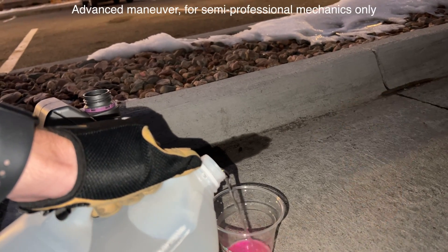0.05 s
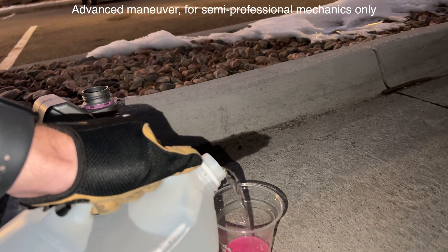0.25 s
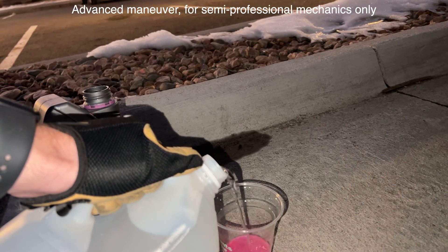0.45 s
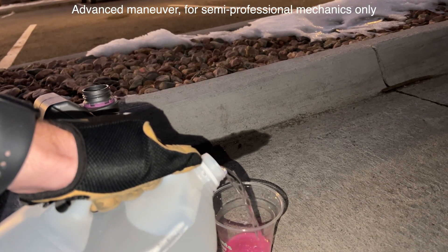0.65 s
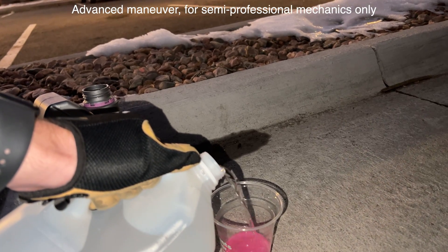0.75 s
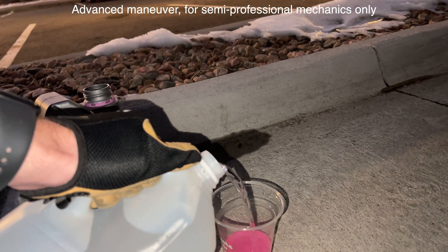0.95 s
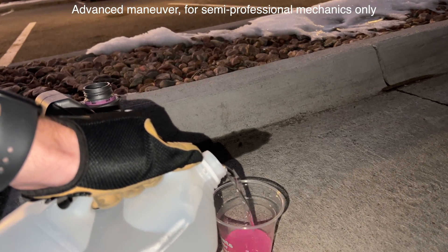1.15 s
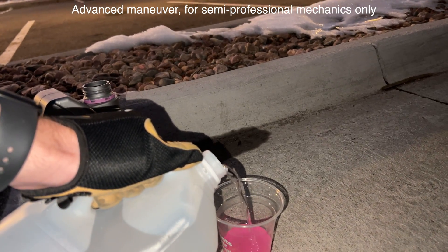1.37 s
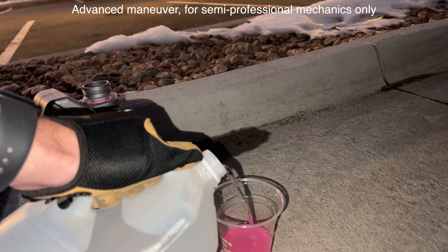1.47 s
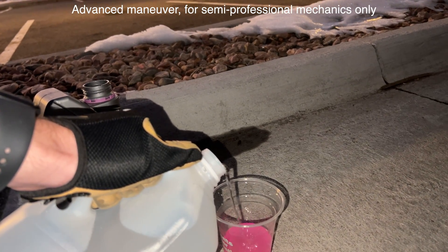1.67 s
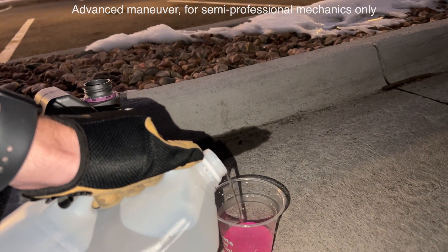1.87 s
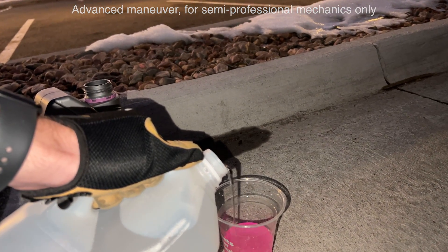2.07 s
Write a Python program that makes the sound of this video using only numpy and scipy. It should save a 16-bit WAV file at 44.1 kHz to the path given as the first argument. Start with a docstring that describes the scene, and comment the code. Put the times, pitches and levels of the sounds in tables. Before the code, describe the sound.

Water dribbling from a jug into a plastic cup outdoors, crackly and bubbly, then nearly silent, then ticking again

```python
"""Outdoors, close to a plastic cup filled from a plastic jug, with traffic rumbling far off.
Where the thin stream breaks up, drops tick on the surface as short noise bursts and trap bubbles that slap and
ring briefly, over a fizz and spray of tiny damped sines. Between about 1.1 and 1.7 s it runs almost silently,
then ticks again. The traffic is shaped noise. The two ports of a phone hear it all with unlike phase."""
import sys
import numpy as np
from scipy import signal
from scipy.fft import rfft, irfft, next_fast_len
from scipy.io import wavfile
from scipy.ndimage import uniform_filter1d

SR = 44100
rng = np.random.default_rng(int(sys.argv[2]) if len(sys.argv) > 2 else 0)


def transcribe(u):
    """Save the signal u as a 16-bit wav file named by the first command-line argument.

    u: samples, shape (n,) or (channels, n), limited to [-1, 1]; the rate is SR.
    q: integer samples, one column per channel.
    """
    v = np.clip(np.atleast_2d(u).T, -1, 1)
    q = np.round(v * 32767).astype(np.int16)
    wavfile.write(sys.argv[1], SR, q)


N = 93227  # samples

# How strongly the stream breaks up: t/s, fizz of small bubbles level/dB, spray level/dB (before the port colour)
SPLASH_LEVELS = [(0, -69, -69), (.05, -68, -80), (.18, -69, -74), (.22, -73, -84), (.41, -67.5, -80),
                 (.45, -62.5, -80), (.57, -69, -76), (.61, -72, -81), (.67, -60, -68.5),
                 (.84, -64.5, -72.5), (.88, -80.5, -81), (1.04, -82, -88), (1.12, -82.5, -81.5),
                 (1.66, -89, -110.5), (1.72, -73.5, -81), (1.8, -88, -87), (1.92, -99, -113),
                 (1.98, -68.5, -85), (2.04, -83, -86)]


def amp(db):
    """Decibels to amplitude."""
    return 10 ** (np.asarray(db) / 20)


def unit(x):
    """Scale to an rms of 1."""
    return x / np.sqrt(np.mean(x ** 2) + 1e-20)


def along(points, hz):
    """Read a curve of (f/Hz, value) points on a log frequency axis."""
    f, value = np.transpose(points)
    return np.interp(np.log(hz + 1), np.log(f + 1), value)


def curves(rows):
    """One value per sample for each column after the time."""
    s, *columns = np.transpose(rows)
    return [np.interp(np.arange(N) / SR, s, column) for column in columns]


def filtered(x, response):
    """Multiply the spectrum of x by a complex response of frequency."""
    m = next_fast_len(N + 8192)
    spectrum = rfft(x, m) * response(np.fft.rfftfreq(m, 1 / SR))
    return irfft(spectrum, m)[..., :N]


def ports(pair, lag, pan):
    """Give each microphone port half of the phase and level difference, with opposite signs."""
    def half(hz):
        level = amp(along(pan, hz) / 2)
        return level * np.exp(-.5j * np.interp(hz, *np.transpose(lag)))

    return filtered(pair, lambda hz: np.array([half(hz), 1 / half(hz)]))


def place(start_s, shapes):
    """Sum short shapes at their start times."""
    first = np.round(np.asarray(start_s) * SR).astype(int)[:, None]
    at = first + np.arange(shapes.shape[1])
    return np.bincount(np.clip(at, 0, N).ravel(), shapes.ravel(), N + 1)[:N]  # overshoot goes in a spare bin


def outdoors():
    """Far traffic: noise, near mono in the rumble and mostly less alike at the ports higher up."""
    level_db, fade_db_per_s = -46, 0.7  # level halfway through; the traffic draws away
    # Colour of the far traffic, relative: f/Hz, level/dB per Hz
    air_colour = [(20, -31.5), (38, -9.5), (52, -2.5), (70, 2.5), (100, -2), (210, -10), (320, -16),
                  (450, -23.5), (600, -29), (900, -26.5), (1300, -35.5), (2000, -45), (3500, -52.5),
                  (7000, -64), (9200, -74), (11000, -67), (14400, -67.5), (15200, -82)]
    # Likeness of the two ports: f/Hz, correlation [-1 to 1]
    air_alike = [(60, .98), (290, 0.95), (600, 0.1), (1400, 0.6), (3300, 0.28), (8000, 0.14), (10500, 0.97)]
    # Phase of the right port over the left: f/Hz, phase/rad
    air_lag = [(80, 0), (500, 1), (900, 2), (2600, 0), (7500, -.4), (9000, -3.1), (11700, -6.3),
               (14400, -9.6)]
    # Level of the left port over the right: f/Hz, level/dB
    air_pan = [(300, 0), (650, -0.5), (1200, -0.5), (5000, -4.5), (9000, 0)]

    def mid_side(hz):
        turn = np.arccos(np.clip(along(air_alike, hz), -1, 1)) / 2
        return amp(along(air_colour, hz)) * [np.cos(turn), np.sin(turn)]

    mid, side = filtered(rng.standard_normal((2, N)), mid_side)
    traffic = unit(ports(np.array([mid + side, mid - side]), air_lag, air_pan))
    from_middle_s = (np.arange(N) - N / 2) / SR
    return amp(level_db - fade_db_per_s * from_middle_s) * traffic


def scattered(x, db, t60):
    """x at both ports, plus a diffuse decaying noise answer drawn afresh for each short block."""
    # Phase of the right port over the left for sound from the cup: f/Hz, phase/rad
    cup_lag = [(0, 0), (860, -2.5), (1200, -.8), (2300, 1.5), (2900, 2), (4000, 1), (7500, -.8),
               (9000, -3.1), (11700, -6.3), (14400, -9.6), (16000, -11.6)]
    # Level of the left port over the right for sound from the cup: f/Hz, level/dB
    cup_pan = [(800, -4), (2300, 0.5), (3000, -5.5), (5500, -9.5), (8000, 0)]
    step = 2048  # samples a block
    diffuse = np.zeros((2, N + 8192))
    fade = amp(-60 * np.arange(step) / SR / t60)
    for i in range(0, N, step):
        echo = rng.standard_normal((2, step)) * fade
        answer = signal.fftconvolve(x[None, i:i + step], echo, axes=1)
        diffuse[:, i:i + answer.shape[1]] += answer / np.linalg.norm(fade)
    return ports(x, cup_lag, cup_pan) + amp(db) * diffuse[:, :N]


def grains(count, hz, spread, cycles, scatter_db):
    """Tiny sines of random time, pitch and size, losing 20 dB in the given cycles; rms 1."""
    u, t = rng.random((count, 3)), np.arange(400) / SR
    f = np.clip(hz * np.exp(spread * rng.standard_normal((count, 1))), 600, 16000)
    size = amp(-scatter_db * np.log(u[:, 1:2]))  # exponential scatter in dB
    decay = amp(-60 * t * f / (3 * cycles))
    return unit(place(u[:, 0] * N / SR, size * np.sin(2 * np.pi * f * t) * decay))


def fizz():
    """Many small bubbles as tiny rings, coloured by the resonances of the air in the cup."""
    # Resonances of the air in the cup: f/Hz, width/Hz, boost/dB
    cup_air = [(1020, 130, 16.5), (2400, 1770, 13), (3645, 390, 7.5)]
    fizz_db, _ = curves(SPLASH_LEVELS)
    small = grains(count=5000, hz=2580, spread=0.69, cycles=20, scatter_db=3.2)

    def cup(f):
        return amp(sum(db / (1 + (2 * (f - centre) / width) ** 2) for centre, width, db in cup_air))

    return amp(fizz_db) * unit(filtered(small, cup))


def spray():
    """Fine high spray: sines so strongly damped that they merge into a hiss."""
    _, spray_db = curves(SPLASH_LEVELS)
    return amp(spray_db) * grains(count=7000, hz=9160, spread=0.46, cycles=3.2, scatter_db=2.8)


def bubbles():
    """A broad slap traps each bubble, which rings: soft start, short hold, decay as the pitch creeps up."""
    # Single bubbles: t/s, level/dB, f/Hz (pitch at the end of the hold)
    trapped = [(0.0442, -67, 2020), (0.0561, -49, 2600), (0.0788, -51.5, 5300), (0.0936, -55, 3710),
               (0.097, -60, 903), (0.0977, -51, 2095), (0.0988, -51, 1640), (0.1095, -54, 1325),
               (0.113, -52, 891), (0.131, -59, 3950), (0.133, -54.5, 2570), (0.1311, -55.5, 1823),
               (0.1334, -54.5, 1330), (0.1517, -48.5, 1220), (0.173, -58, 1650), (0.176, -54, 2130),
               (0.2076, -56, 3570), (0.2422, -48.5, 2690), (0.26, -62, 2250), (0.2749, -57.5, 3210),
               (0.4433, -52.5, 3500), (0.4463, -54, 5160), (0.4613, -57.5, 2440), (0.4815, -52.5, 3400),
               (0.4955, -54.5, 2420), (0.5308, -60, 1370), (0.539, -57.5, 1990), (0.5419, -57, 3720),
               (0.5415, -56.5, 2880), (0.552, -55, 902), (0.5867, -64.5, 5630), (0.6437, -59, 1326),
               (0.66, -66, 3700), (0.665, -61, 1340), (0.6707, -50, 3470), (0.6857, -51, 3840),
               (0.6868, -53, 2600), (0.801, -58, 3600), (0.6991, -53, 3000), (0.7153, -56.5, 3750),
               (0.7472, -47.5, 2710), (0.749, -53.5, 954), (0.759, -54, 5500), (0.7689, -51, 1004),
               (0.769, -51, 2600), (0.771, -56, 3630), (0.7808, -53.5, 3730), (0.7854, -58.5, 1348),
               (0.8128, -58, 3850), (0.8274, -48.5, 3680), (0.838, -65, 3720), (1.024, -69, 3460),
               (1.0526, -61.5, 3350), (1.07, -67, 3660), (1.197, -66.5, 2840), (1.198, -59, 3600),
               (1.682, -58, 1033), (1.701, -64.5, 1930), (1.708, -62.5, 1074), (1.7513, -59.5, 1647),
               (1.887, -69.5, 3310), (1.938, -58, 1296), (1.9471, -58, 1140), (1.9476, -62, 5600),
               (1.9572, -54, 1008), (1.9771, -62, 1860), (1.985, -56.5, 1154), (1.985, -53, 2690),
               (1.9856, -60.5, 3920), (1.9884, -51, 5710), (2.0155, -55.5, 1063)]
    attack, hold, t60 = 0.78, 6.03, 65  # cycles
    rise_hz, rough_rad = 11.45, 0.79  # pitch gained a cycle; rms phase jitter
    slap_db, slap_octaves, slap_t60_s = -13.5, 1, 0.045
    s, db, hz = np.transpose(trapped)[:, :, None]
    t, f = np.arange(1600) / SR, np.fft.rfftfreq(1600, 1 / SR)
    noise = rng.standard_normal((len(s), 2, 1600))

    cycle = hz * t
    envelope = (1 - np.exp(-cycle / attack)) * amp(-60 * np.maximum(cycle - hold, 0) / t60)
    shake = rough_rad * uniform_filter1d(noise[:, 0], size=100, axis=1) * 10  # 10 restores unit rms
    phase = 2 * np.pi * cycle * (1 + rise_hz / hz * (cycle / 2 - hold)) + shake
    ring = envelope * np.sin(phase)

    band = np.exp(-(np.log2((f + 1) / hz) / slap_octaves) ** 2)
    slap = irfft(rfft(noise[:, 1]) * band)
    slap = slap / slap.std(axis=1, keepdims=True) * amp(slap_db - 60 * t / slap_t60_s)
    return place(s[:, 0], amp(db) * (ring + slap))


def ticks():
    """Each drop striking the surface is a short noise burst: a band of its own over a broad treble."""
    # Drops striking the surface: t/s, level/dB (before the envelope and port colour), f/Hz (band centre)
    strikes = [(0.0463, -56, 7800), (0.054, -56, 8100), (0.0656, -57, 8250), (0.097, -49.5, 9500),
               (0.1134, -55, 11000), (0.133, -55, 8700), (0.1612, -50, 7200), (0.1967, -60.5, 9000),
               (0.2407, -45.5, 9200), (0.266, -54.5, 10000), (0.289, -58.5, 8400), (0.299, -59, 13900),
               (0.336, -60.5, 8100), (0.3664, -60, 11700), (0.4052, -54, 11400), (0.4146, -69, 14200),
               (0.43, -51.5, 11100), (0.4667, -55, 12000), (0.4772, -49, 7300), (0.4954, -50.5, 5030),
               (0.5487, -51.5, 9100), (0.5575, -62, 7100), (0.5735, -59.5, 11500), (0.5844, -53.5, 6600),
               (0.5956, -64, 13400), (0.6143, -59, 11900), (0.69, -55.5, 11400), (0.707, -53, 7700),
               (0.7363, -47.5, 6650), (0.779, -57, 6200), (0.822, -57, 6700), (0.857, -63, 13800),
               (0.884, -58.5, 13400), (0.938, -64, 14800), (0.8996, -63, 13000), (0.917, -59, 9500),
               (0.9605, -62, 9700), (1.0025, -72, 14100), (1.037, -73, 14000), (1.056, -59, 7700),
               (1.0613, -67, 12100), (1.089, -69.5, 12600), (1.1377, -65.5, 13400), (1.162, -70, 7500),
               (1.178, -73, 12500), (1.196, -64.5, 10300), (1.3547, -61.5, 11500), (1.373, -68, 13100),
               (1.706, -54.5, 8600), (1.7356, -45.5, 9100), (1.7507, -62, 8900), (1.9488, -46.5, 8400),
               (1.9605, -55, 7900), (1.965, -57, 11300), (1.984, -48.5, 8640), (1.993, -70, 6640),
               (2.0099, -48, 8450), (2.0892, -47.5, 10300)]
    t60_s, rise_s = .0105, .0008
    width_hz, broad_db, low_hz = 1800, -11, 6000  # below low_hz a drop makes little broad noise
    s, db, hz = np.transpose(strikes)
    t, f = np.arange(512) / SR, np.fft.rfftfreq(512, 1 / SR)
    band = np.exp(-((f - hz[:, None]) / width_hz) ** 2)
    broad = amp(broad_db) / (1 + (low_hz / (f + 1)) ** 6)
    noise = irfft(rfft(rng.standard_normal((len(s), 512))) * (band + broad))
    noise /= noise.std(axis=1, keepdims=True)
    envelope = amp(-60 * t / t60_s) * (1 - np.exp(-t / rise_s)) * 2
    return place(s, amp(db)[:, None] * noise * envelope)


def water():
    """All that the stream makes: bubbles and fizz with the ground's answer, ticks and spray with the rim's."""
    # Treble colour at the ports: f/Hz, level/dB
    port_colour = [(5000, -12.5), (7800, 0), (9500, -13), (11500, -1.5), (13500, -6), (15000, 0.5),
                   (16200, -23)]
    treble = filtered(ticks() + spray(), lambda hz: amp(along(port_colour, hz)))
    low = scattered(bubbles() + fizz(), db=-6.5, t60=.04)  # ground; t60 in seconds
    high = scattered(treble, db=-7, t60=.012)  # rim
    return low + high


def scene():
    """The stream in front of the far traffic."""
    return water() + outdoors()


def record(dry):
    """The microphone path keeps nothing from 16400 Hz up."""
    return filtered(dry, lambda hz: hz < 16400)


dry = scene()
out = record(dry)
transcribe(out)
```